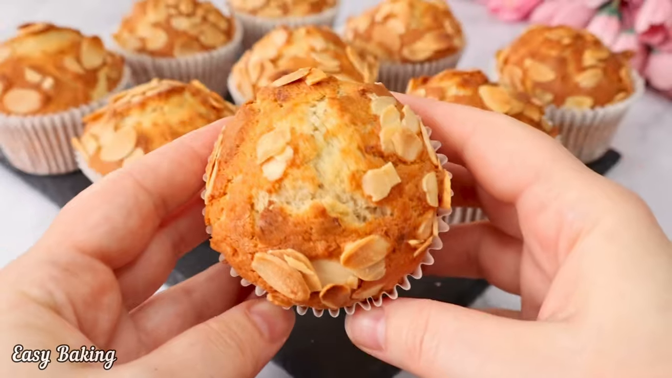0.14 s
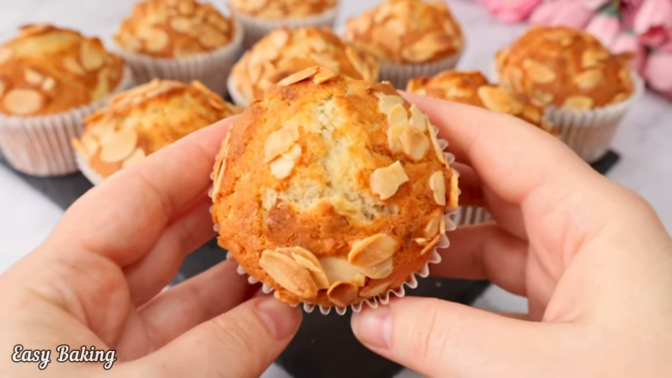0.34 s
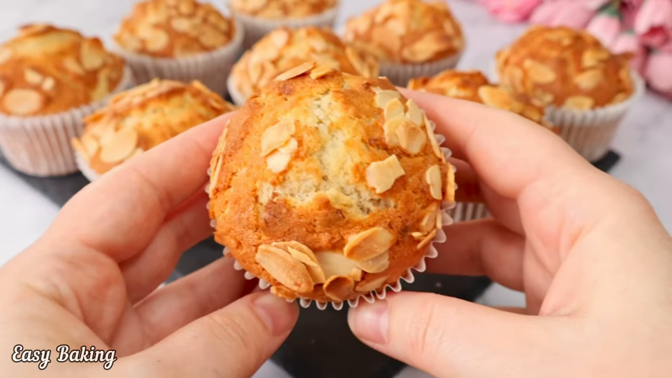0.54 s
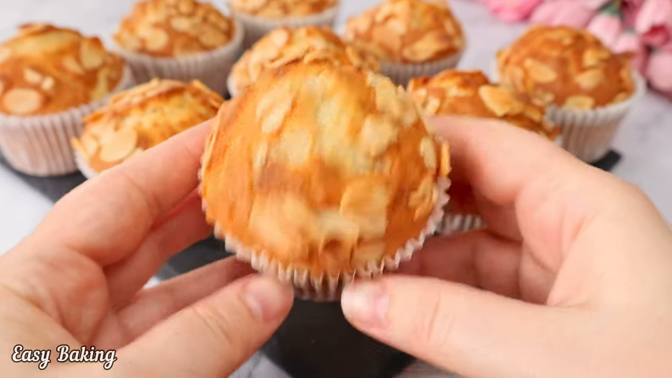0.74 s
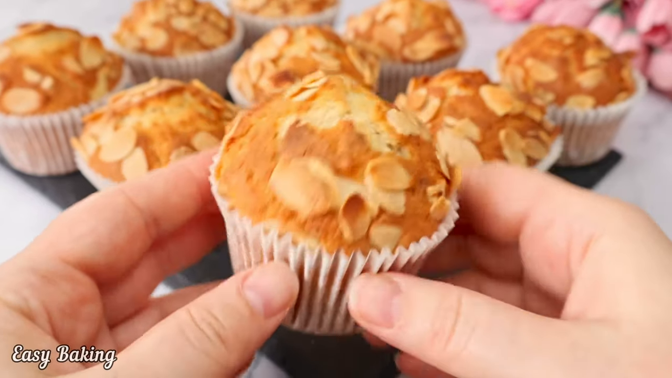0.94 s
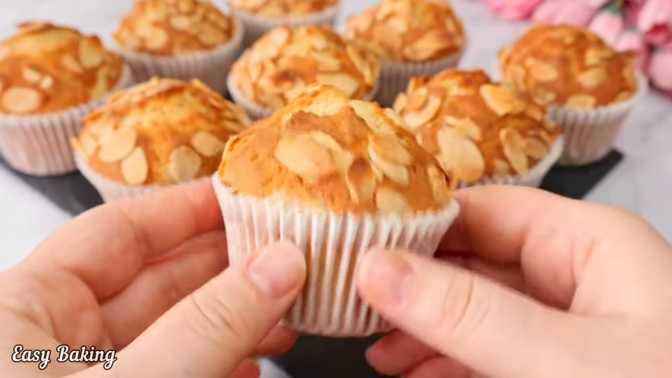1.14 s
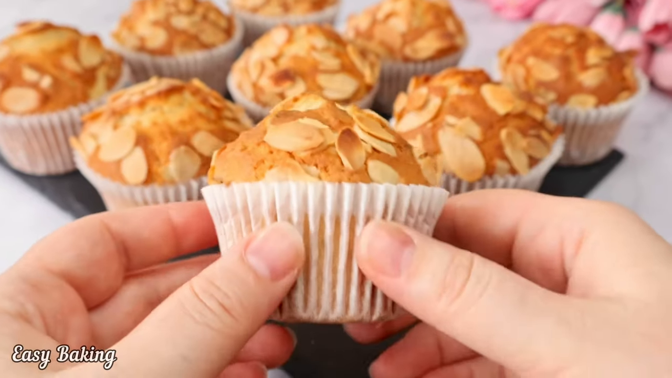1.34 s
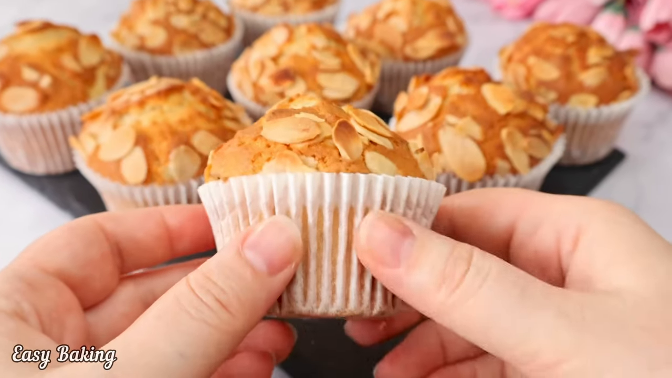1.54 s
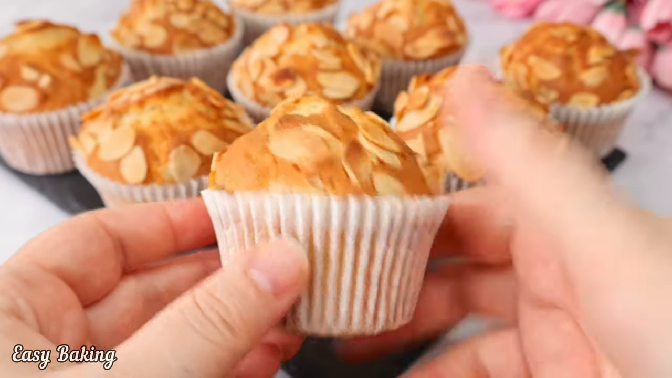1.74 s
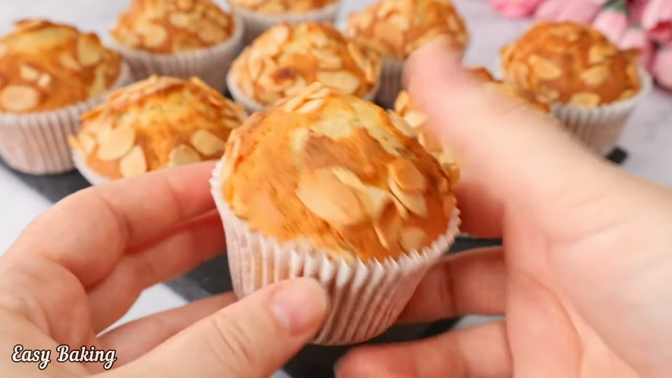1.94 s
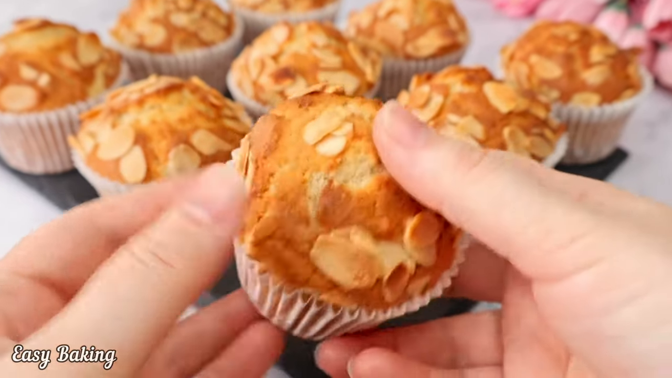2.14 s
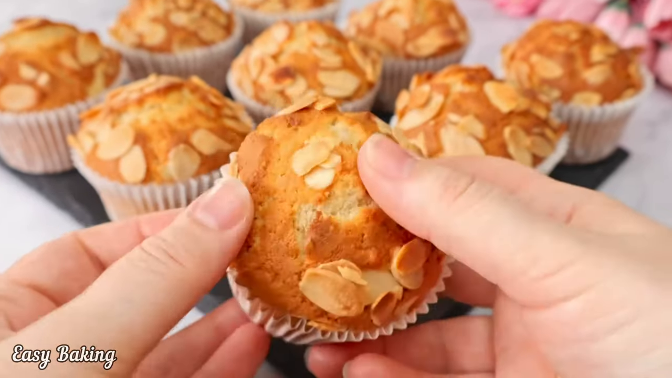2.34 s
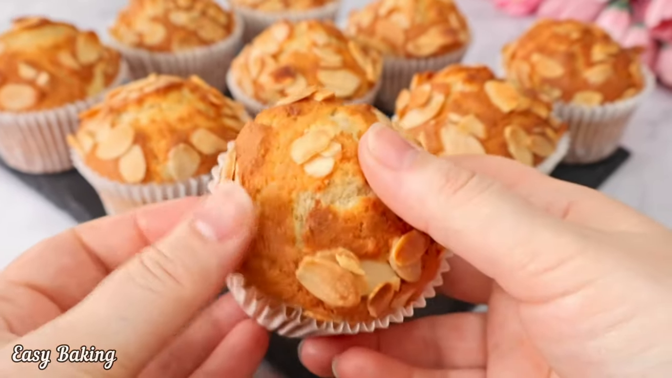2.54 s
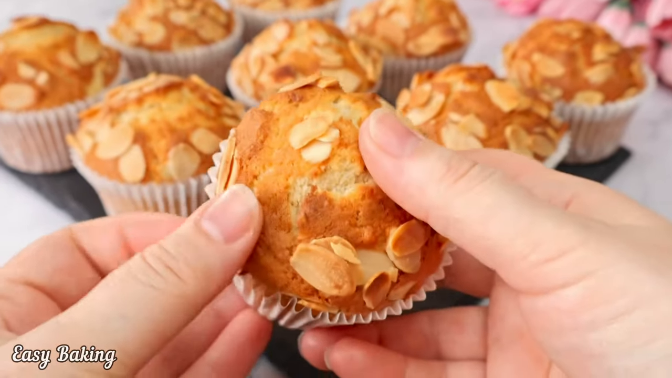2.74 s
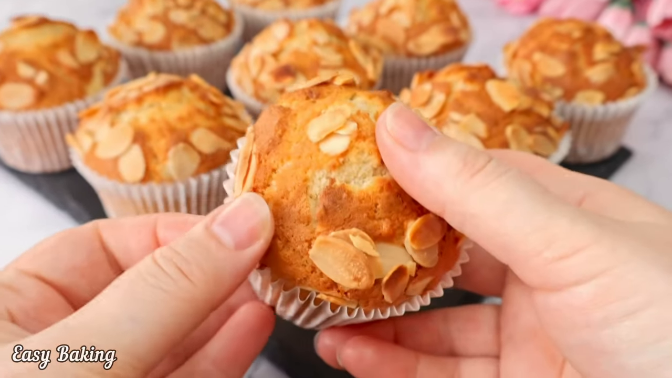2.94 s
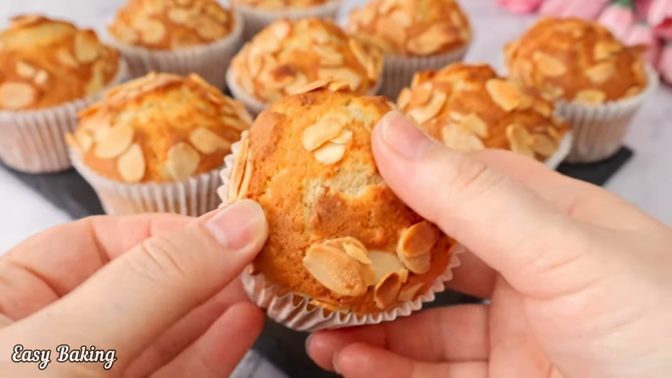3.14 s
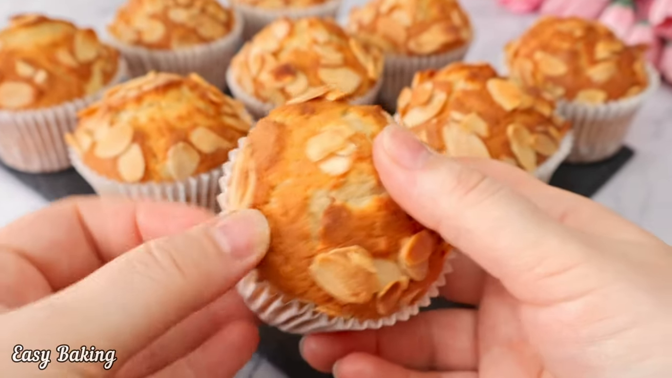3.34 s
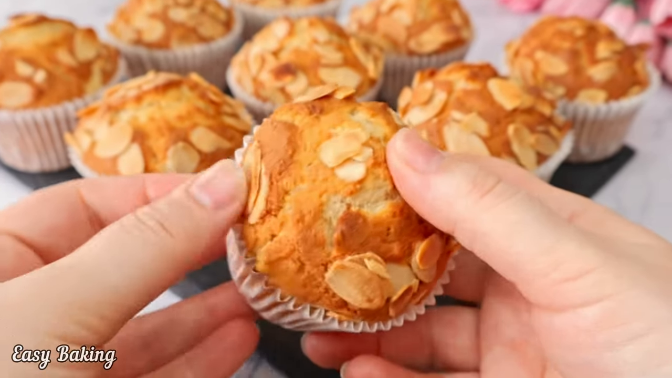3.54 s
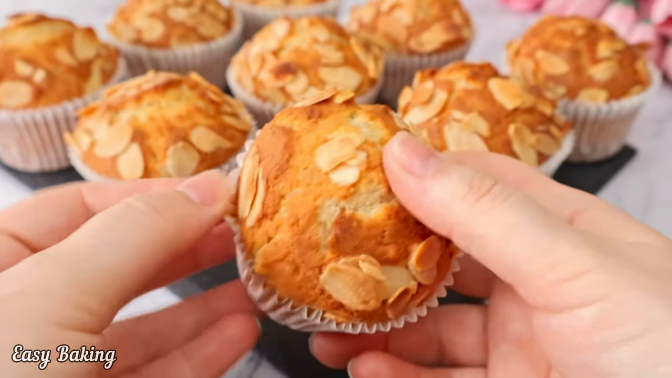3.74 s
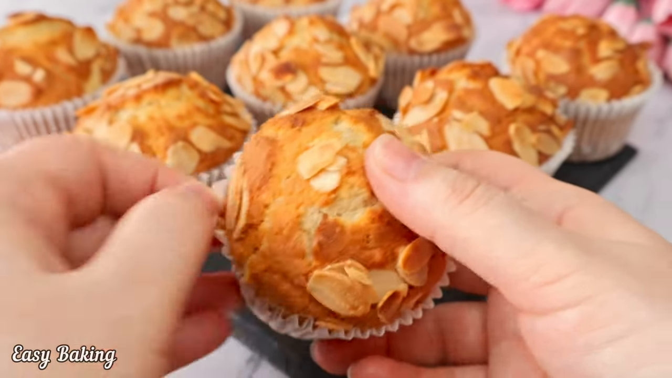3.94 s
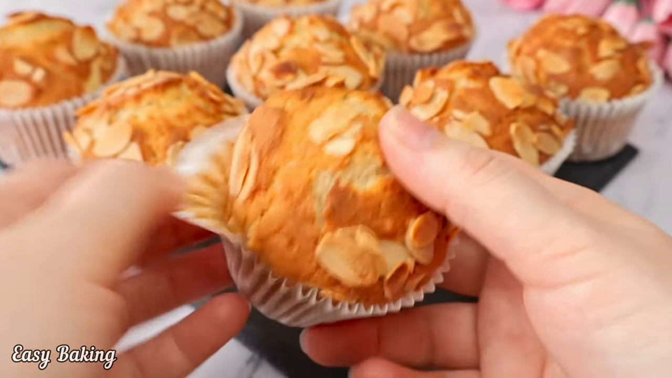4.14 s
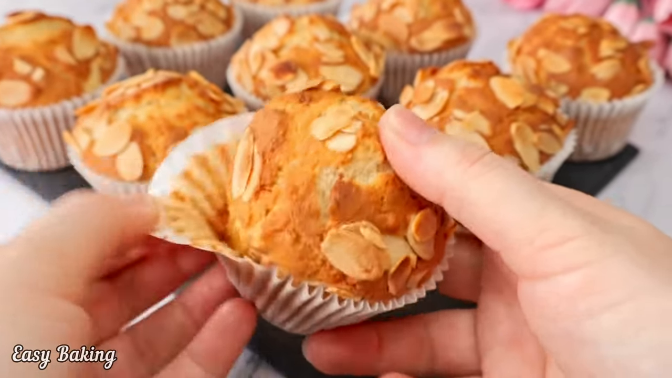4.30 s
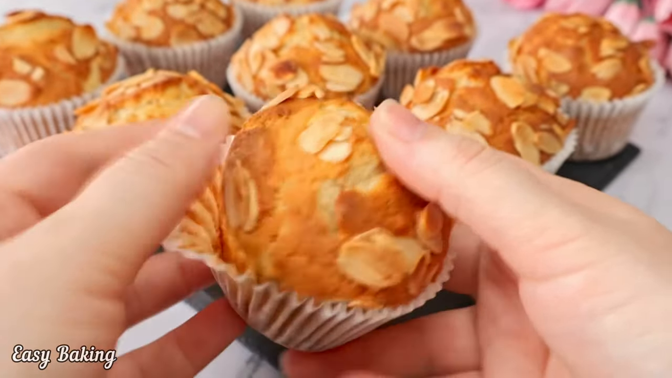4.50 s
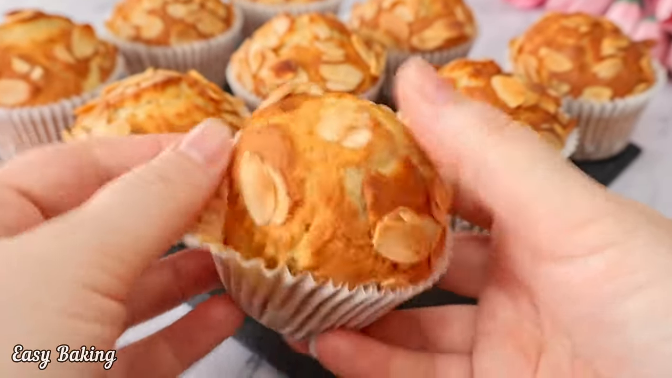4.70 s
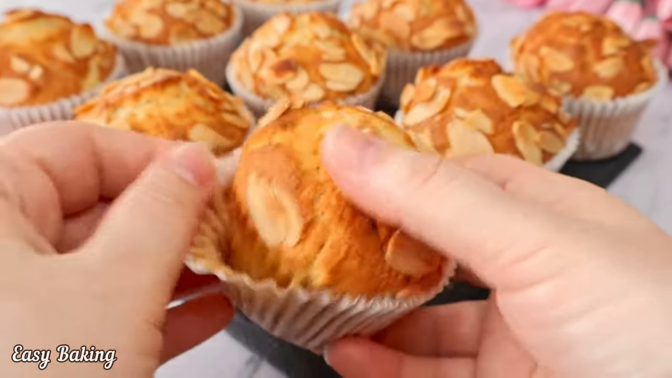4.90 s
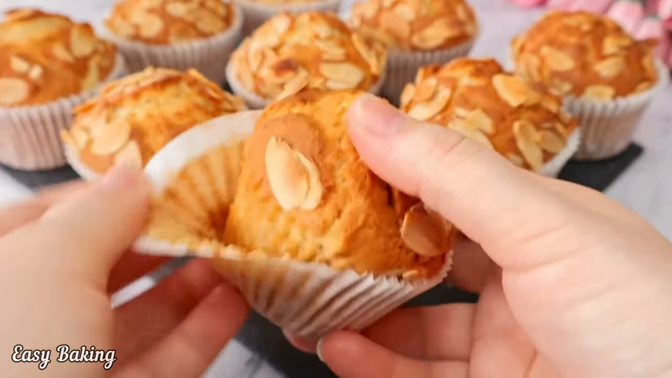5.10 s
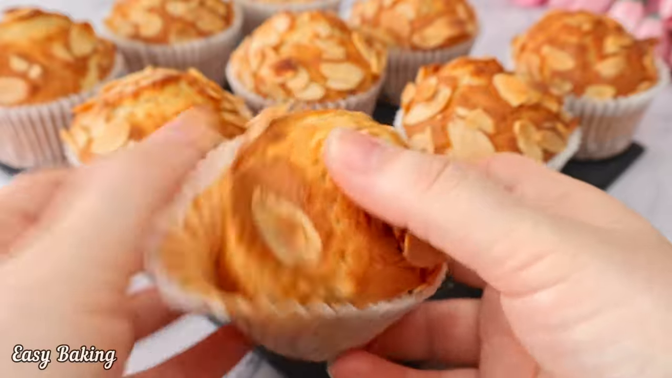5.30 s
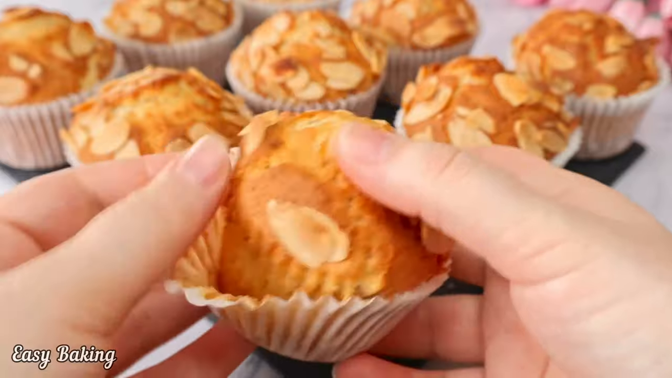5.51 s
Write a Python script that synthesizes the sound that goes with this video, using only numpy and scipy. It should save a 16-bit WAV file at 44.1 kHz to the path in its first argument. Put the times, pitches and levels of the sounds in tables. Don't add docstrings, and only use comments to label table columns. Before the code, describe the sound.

First, high thin bird sweeps and brief chirps over a soft airy wash, with only tiny skin-on-paper scuffs nearby. Then a muffin's pleated case is peeled: one sharp snap, dense crackling pulls, a lull with a faint hollow rub, another crackling cluster, and a hard late snap. Paper is dry, bright and close to the microphone; birds stay distant and echoing.

```python
import sys
import numpy as np
from scipy import signal
from scipy.fft import rfft, irfft
from scipy.io import wavfile
from scipy.ndimage import uniform_filter1d, map_coordinates

SR = 44100
rng = np.random.default_rng(int(sys.argv[2]) if len(sys.argv) > 2 else 0)


def to_linear_factor(level_db):
    exponent = np.asarray(level_db, float) / 20
    return 10 ** exponent


def store_pcm(level_fs):
    pcm = np.round(np.clip(level_fs, -1, 1) * 32767).astype(np.int16)
    wavfile.write(sys.argv[1], SR, np.atleast_2d(pcm).T)


N = 249606


def spectrum_at(points, hz):
    f, value = np.transpose(points)
    return np.interp(np.log(hz + 1), np.log(f + 1), value)


def evened(x):
    return x / np.sqrt(np.mean(x ** 2) + 1e-20)


def colour(x, points):
    gain = to_linear_factor(spectrum_at(points, np.fft.rfftfreq(N, 1 / SR)))
    return irfft(rfft(x) * gain, N)


def add(mix, s, sound):
    part = mix[..., round(s * SR):][..., :sound.shape[-1]]
    part += sound[..., :part.shape[-1]]


def echoes(t60, gap_s, channels):
    t = np.arange(round(.9 * SR)) / SR
    onset = np.clip((t - gap_s) / gap_s, 0, 1)
    tail = rng.standard_normal((channels, len(t))) * to_linear_factor(-60 * t / t60) * onset
    return tail / np.linalg.norm(tail, axis=1, keepdims=True)


# (frequency [Hz], density [dB per Hz])
HISS = [(3, -1), (8, -1.5), (21, -12), (36, -14.5), (62, -20.5), (100, -24), (400, -28), (1500, -34.5),
        (5000, -36), (9000, -38), (12000, -39), (15800, -41.5)]


def microphone_hiss():
    return to_linear_factor(-52.5) * evened(colour(rng.standard_normal(N), HISS))


# (frequency [Hz], density [dB per Hz])
AIR = [(25, -25), (60, 4), (100, -6.5), (300, -5), (700, 0.5), (1500, -4), (3000, -8), (5000, -12.5),
       (8000, -28), (12000, -38)]


def garden_air():
    return to_linear_factor(-59) * evened(colour(rng.standard_normal((2, N)), AIR))


def whistle(length, start_hz, end_hz, db, pan_db, shakes=0., depth_hz=0., throb=0.):
    t = np.arange(round(length * SR)) / SR
    shake = np.sin(2 * np.pi * shakes * t)
    hz = start_hz + (end_hz - start_hz) * (t / length) ** .75 + depth_hz * shake
    wobble = evened(uniform_filter1d(rng.standard_normal(SR // 4), 120))[:len(t)]
    hz = hz + 45 * (hz / 8000) ** 4 * wobble
    shape = signal.windows.tukey(len(t), min(0.0065 / length, 1)) * (1 + throb * shake)
    lag = np.array([[0], [2 * np.pi * rng.uniform(0.14, 0.63)]])
    ears = to_linear_factor(db + np.array([[.5], [-.5]]) * pan_db)
    return np.sqrt(2) * ears * shape * np.sin(2 * np.pi * np.cumsum(hz) / SR + lag)


# (length [s], start [Hz], end [Hz], level [dB])
EARLIER = [
    (.07, 4290, 4110, -45),
    (.06, 4100, 3700, -51),
]
# (time [s], length [s], start [Hz], end [Hz], left-ear level [dB])
LEFT_BIRD = [(1.043, 0.01, 2530, 2880, -50), (1.037, .112, 2760, 2880, -50.5),
             (1.12, 0.017, 4420, 4570, -49.5), (1.226, .013, 2250, 2850, -48.5),
             (1.238, 0.062, 2833, 2890, -47), (1.298, .06, 2890, 2920, -53), (1.375, .045, 2900, 2930, -53),
             (1.218, 0.014, 2300, 2270, -53.5), (1.497, 0.018, 2850, 2330, -44),
             (1.538, .015, 2350, 2950, -45), (1.559, 0.011, 2950, 2370, -44),
             (1.551, 0.009, 3250, 3400, -48), (1.636, 0.014, 3400, 2350, -50),
             (2.476, 0.056, 4380, 4423, -55), (1.147, .022, 4920, 4770, -54.5),
             (1.168, 0.018, 3950, 3780, -37), (1.285, .06, 3500, 3200, -57),
             (1.273, 0.0139, 3310, 2670, -41.5), (2.65, 0.055, 3340, 3220, -55)]
# (time [s], length [s], start [Hz], end [Hz], left-ear level [dB])
HIGH_BIRD = [(.385, 0.078, 8680, 8280, -53), (.475, 0.071, 8350, 7700, -50), (.65, 0.061, 7500, 6450, -55),
             (.69, 0.1, 8300, 7640, -49), (.897, .04, 7280, 6480, -53.5), (.9, 0.09, 8150, 7940, -51),
             (.991, 0.042, 8000, 7420, -51), (.935, .08, 6550, 6650, -61)]
# (time [s], length [s], start [Hz], end [Hz], left-ear level [dB])
FRONT_BIRDS = [(.016, .015, 3390, 3430, -56), (.012, 0.03, 3880, 3780, -60), (.128, .015, 3360, 3370, -54),
               (.237, .015, 3240, 3380, -58), (1.135, .015, 3770, 3890, -47),
               (1.186, 0.0135, 3700, 2800, -55), (1.252, 0.028, 3210, 3270, -46.5),
               (1.266, .008, 3300, 3650, -47), (1.377, .029, 2420, 2360, -59),
               (1.478, .01, 2850, 3050, -53), (1.491, .016, 4160, 4030, -50),
               (1.592, 0.015, 4080, 4070, -51), (2.893, 0.035, 4390, 4370, -54.5),
               (1.625, .015, 3340, 3360, -56), (2.106, .24, 3354, 3294, -46), (2.519, .02, 3720, 3940, -44),
               (2.601, .075, 4110, 4150, -53), (2.702, .068, 3170, 3200, -51),
               (2.838, .022, 3960, 3980, -54.5), (2.939, 0.017, 4030, 3953, -45),
               (2.955, .024, 3410, 3580, -50.5)]
# (time [s], length [s], start [Hz], end [Hz], shake rate [per s])
WARBLES = [
    (1.78, .07, 2260, 2350, 33),
    (1.845, .135, 2380, 2640, 33),
    (2.065, .05, 3420, 3340, 115),
    (2.69, .09, 5480, 5080, 70),
]
WARBLES_DB = [-66, -56, -51, -63.5]
# (time [s], length [s], start [Hz], end [Hz], throb rate [per s])
THROBS = [(2.368, .095, 4440, 4370, 52), (2.55, .13, 4550, 4570, 62), (2.2, .105, 3355, 3335, 5),
          (2.63, .2, 6950, 6800, 40), (1.55, .04, 4550, 4550, 50), (2.46, .1, 4400, 4340, 52)]
THROBS_DB = [-45, -60, -57, -79, -66, -47]


def bird_notes(lead):
    direct = np.zeros((2, N + lead))
    heard = direct[:, lead:]
    for note in EARLIER:
        add(direct, 0, whistle(*note, 0.))
    for song, pan_db in ((LEFT_BIRD, 24), (HIGH_BIRD, 9), (FRONT_BIRDS, 4.5)):
        for s, *note, left_db in song:
            add(heard, s, whistle(*note, left_db - pan_db / 2, pan_db))
    for (s, *note, shakes), db in zip(WARBLES, WARBLES_DB):
        add(heard, s, whistle(*note, db, 6.0, shakes, depth_hz=140, throb=0.43))
    for (s, *note, shakes), db in zip(THROBS, THROBS_DB):
        add(heard, s, whistle(*note, db, 8., shakes, depth_hz=15, throb=.4))
    return direct


# (frequency [Hz], echo level [dB])
WETNESS = [(1500, -10), (3000, 1.5), (4500, 5.5), (6000, 9), (8000, 5.5)]


def birds():
    lead = SR // 10
    direct = bird_notes(lead)
    trees = signal.fftconvolve(direct[:1], echoes(t60=1.1, gap_s=0.008, channels=2), axes=1)
    trees = trees[:, lead:N + lead]
    drift = uniform_filter1d(uniform_filter1d(rng.standard_normal(N), 700), 700)
    sway = np.arange(N) + 1.4 * evened(drift)
    trees = np.array([map_coordinates(ear, [sway], order=3, mode="nearest") for ear in trees])
    return to_linear_factor(0.5) * direct[:, lead:] + to_linear_factor([[-9], [-11]]) * colour(trees, WETNESS)


def crackle(per_s, spread_db):
    clumps = to_linear_factor(2.2 * evened(uniform_filter1d(rng.standard_normal(N), 150)))
    size = to_linear_factor(spread_db * np.minimum(rng.exponential(1, N), 4)) * rng.standard_normal(N)
    return evened(clumps * size * (rng.random(N) < per_s / SR))


def hum(curve, half_width_hz):
    s, hz, db = np.transpose(curve)
    t = np.arange(N) / SR
    lowpass = signal.butter(2, half_width_hz, fs=SR, output="sos")
    grain = evened(signal.sosfilt(lowpass, crackle(per_s=8000, spread_db=0.0)))
    level = to_linear_factor(np.interp(t, s, db, left=-120, right=-120))
    carrier = np.sin(2 * np.pi * np.cumsum(np.interp(t, s, hz)) / SR)
    return np.sqrt(2) * level * grain * carrier


# (time [s], pitch [Hz], level [dB])
HOLLOW = [
    (4.64, 2600, -69),
    (4.679, 2640, -52.5),
    (4.778, 2760, -51.5),
    (4.86, 2800, -53),
    (4.91, 2860, -52.5),
    (4.94, 2890, -71),
]


def hollow_case():
    return hum(HOLLOW, half_width_hz=220)


# (time [s], pitch [Hz], level [dB])
RIM = [
    (4.65, 13700, -70),
    (4.69, 13700, -55),
    (4.71, 13800, -54),
    (4.76, 14000, -65),
    (4.9, 13600, -63),
    (4.92, 13600, -75),
]


def nail_on_rim():
    return hum(RIM, half_width_hz=500)


def ring(x, modes):
    pulse, body = signal.unit_impulse(1024), 0
    for k, (hz, width, db) in enumerate(modes):
        b, a = signal.iirpeak(hz, hz / width, SR)
        body = body + (-1) ** k * to_linear_factor(db) * signal.lfilter(b, a, signal.lfilter(b, a, pulse))
    return signal.oaconvolve(x, body / np.linalg.norm(body))[:N]


# (frequency [Hz], width [Hz], level [dB])
PRESS = [(330, 334, 0)]
# (time [s], level [dB], fall on either side [dB per s])
PRESSES = [
    (.71, -57.5, 78),
    (2.9, -60, 120),
    (3.37, -64.5, 28),
    (3.59, -52.5, 450),
    (3.95, -61.5, 25),
    (4.27, -51.5, 240),
    (4.68, -59.5, 18),
    (5.11, -55, 154),
    (5.23, -55, 108),
    (5.53, -52.5, 190),
]


def cake_rub():
    t = np.arange(N) / SR
    press_db = np.max([db - fall * abs(t - s) for s, db, fall in PRESSES], axis=0)
    grip_db = -69
    return to_linear_factor(np.maximum(press_db, grip_db)) * ring(rng.standard_normal(N), PRESS)


# (frequency [Hz], width [Hz], level [dB])
THUD = [(740, 900, 13.4), (1626, 1250, 20.2)]
BODY = [(3004, 1050, -2), (4440, 2200, -3.5)]
CRACK = [(5950, 1560, 0.013), (8600, 2930, 0)]
FIZZ = [(13900, 4100, -10), (14300, 1400, -14)]


def paper(drive):
    return sum(ring(d, modes) for d, modes in zip(drive, (CRACK, THUD, BODY, FIZZ)))


# (time [s], length [s], crack [dB], thud over crack [dB], fizz over crack [dB])
SLIDES = [(.671, 0.092, -48, -38, -7), (.707, 0.15, -58.5, -5, -2), (1.18, .073, -67, -7, -6),
          (1.637, 0.13, -63.5, -8, -9), (1.787, 0.038, -58.5, -8, -12), (1.872, .062, -56.5, -9, -5),
          (1.976, .11, -50.5, -26, -13), (2.17, .03, -68, -12, 2), (2.22, 0.044, -66, -7, -9),
          (2.54, .041, -64, -9, -6), (2.856, 0.098, -61.5, 0, -2), (3.225, 0.012, -58.5, -6, -5),
          (3.33, .066, -50.5, -46, -6), (3.568, 0.027, -61.5, 3, -6)]
# (time [s], length [s], crack [dB], thud over crack [dB], fizz over crack [dB])
TEARS = [(3.792, 0.029, -37, -12.5, -11), (3.905, 0.053, -48, -16, -7), (4.063, 0.078, -49, -11, -8),
         (4.124, 0.1, -49.5, -7, -1), (4.182, 0.077, -46.5, -2, -5), (4.237, 0.072, -47.5, -12, -5),
         (4.28, 0.062, -55.5, -3, -8), (4.383, .12, -53.5, -1.5, -4), (4.425, 0.031, -46, -11, -12),
         (4.588, 0.036, -57.5, 0, -11), (4.638, 0.13, -50, -5.5, -11), (4.7, 0.012, -44, -9, -6),
         (4.718, 0.18, -48.5, -6, -13), (4.856, 0.064, -53.5, 1.5, -10), (4.989, 0.13, -48, -9, -2),
         (5.083, .13, -53, -0.5, -7), (5.019, 0.017, -36, -2, -2), (4.992, 0.013, -52, 10, -6),
         (4.259, .009, -36, -3, -8), (5.172, 0.16, -54.5, 1, -21), (5.297, 0.023, -46, -2, 1),
         (5.305, 0.18, -63, 0.5, -7), (5.464, 0.13, -63, 6, -21), (5.6, 0.11, -48, -4.5, -10)]


def rustle():
    power = np.zeros((4, N))
    for scuffs, body_db in ((SLIDES, -6), (TEARS, -0.8)):
        for s, length, db, depth_db, fizz_db in scuffs:
            swell = signal.windows.tukey(round(length * SR), .85)
            parts_db = np.array([0, depth_db, body_db + 0.2 * depth_db, fizz_db])
            add(power, s, (to_linear_factor(db + parts_db[:, None]) * swell) ** 2)
    fine = crackle(per_s=10000, spread_db=-4.0)
    coarse = crackle(per_s=5000, spread_db=0.1)
    middle = crackle(per_s=5000, spread_db=1.5)
    thin = crackle(per_s=6000, spread_db=2)
    grains = [fine, coarse, 0.9 * coarse + 0.72 * middle, 1.34 * fine + 0.69 * thin]
    return paper(np.sqrt(power) * grains)


def flattened(noise, bins):
    spectrum = rfft(noise)
    return irfft(spectrum / uniform_filter1d(abs(spectrum), size=bins))


# (frequency [Hz], level [dB])
TOP = [(15900, 0), (16100, -17), (17100, -22), (17200, -90)]
# (time [s], level [dB], pitch of the
# patch [Hz])
FLEXES = [(4.1838, -26.5, 6100), (4.2619, -38, 5950), (4.2641, -25.5, 5870), (4.29, -47, 5950),
          (5.0963, -36, 6100), (5.542, -47, 6300), (4.2296, -35, 800), (4.273, -41.5, 422),
          (4.418, -47, 1540), (4.4595, -46, 1100), (4.703, -50, 1190), (4.884, -48, 1640),
          (4.999, -37, 1080), (5.021, -39, 940), (5.117, -45, 1530), (5.138, -38, 1900), (5.286, -50, 800),
          (5.63, -51, 1340), (4.19, -41, 14000), (4.2055, -39, 13800), (4.2305, -42, 14000),
          (4.2635, -35, 13900), (4.684, -51, 13700), (4.8075, -44, 8000), (4.9858, -29, 9100),
          (5.0323, -29.5, 8050), (5.0035, -40, 5300), (5.067, -41, 5500), (3.7958, -38.5, 4500),
          (3.8063, -46, 3600), (5.338, -56, 5550), (5.354, -55, 5000), (4.601, -57, 2720),
          (3.766, -23, 14300), (5.4695, -28, 6400), (5.4695, -24, 14400), (5.0315, -33, 650),
          (4.2635, -31, 2900), (4.193, -41, 2800), (4.7025, -44, 6000), (5.101, -38, 7500),
          (3.909, -30, 9500), (3.588, -52, 600)]


def flexes():
    out, t = np.zeros(N), np.arange(300) / SR
    decay_s = 0.0008
    for s, db, hz in FLEXES:
        noise = rng.standard_normal(len(t)) * np.exp(-t / decay_s)
        shake = evened(flattened(noise, 9) * np.exp(-t / (2 * decay_s)))
        width_hz = 530 + .22 * hz
        add(out, s, ring(to_linear_factor(db) * shake, [(hz, width_hz, 0)]))
    return colour(out, TOP)


# (time [s], crack [dB], depth of fold as thud over crack [dB], fizz
# over crack [dB])
PLEAT_SNAPS = [(3.7662, -14, -48, -4), (3.8985, -51, -12, 3), (3.796, -36, -6, -11), (3.9098, -26, -35, 7),
               (3.915, -43, -14, -2), (3.924, -46, -6, -10), (3.9297, -36.5, -18, -10),
               (3.9343, -24.5, -27, -14), (3.9367, -29.5, -22, -10), (3.9747, -41, -21, 8),
               (3.982, -24, -39, -10), (4.205, -47, -12, 7), (4.087, -45, -19, -9), (4.1, -35.5, -3, -9),
               (4.1321, -24.5, -20, 3), (4.1532, -42, -9, -2), (4.183, -30, 1.5, -2), (4.1839, -22, -15, 0),
               (4.1872, -28, -18, -8), (4.1897, -36.5, 0, 4), (4.193, -44, 2, -8), (4.2167, -33, -21, -7),
               (4.22, -41, -9, 0), (4.2298, -43.5, 6, -6), (4.2456, -34, -24, -7), (4.2492, -33, -20, -13),
               (4.253, -28, -24, -16), (4.261, -35, -4, -5), (4.2631, -25, -4.5, -9),
               (4.274, -45.5, 8.5, -6), (4.315, -51.5, 7, -11),
               (4.4026, -44.5, 2.5, -17), (4.442, -39, -24, -10), (4.4584, -38, -1.5, -18),
               (4.8087, -41, -19, -6), (4.9722, -47, 2, -14), (4.9777, -34.5, -14, -11),
               (4.9854, -24, -17, -1.5), (5.0013, -32, 1, -14), (5.0056, -33, -20, -9),
               (5.0205, -27.5, 0, -4), (5.032, -26, 3.5, -5), (5.0435, -30, -36, -1),
               (5.048, -28.5, -37, 0), (5.059, -42, -4, -4), (5.067, -39, -9, -6), (5.0875, -40, 2, 5),
               (5.0969, -20.5, -6, -3), (5.1008, -33, -22, -14), (5.11, -41, -19, 12),
               (5.1293, -34, -26, -4), (5.138, -45, 7, -4), (5.038, -38, -15, -3), (5.305, -35, -10, -10),
               (5.295, -51.5, 7, -11), (5.4676, -39, -12, 7), (5.4691, -14, -15, -3.5),
               (5.539, -49, -21, -21), (5.5433, -44, -18, -20), (5.5606, -40, -16, -25),
               (5.572, -51, -2, -15), (5.594, -34.5, -7, -19)]


def snaps():
    drive, t = np.zeros((4, N)), np.arange(220) / SR
    for s, db, depth_db, fizz_db in PLEAT_SNAPS:
        ms = max(.53 + .016 * depth_db - .0125 * db, .2)
        body_db = -2.5 + 0.29 * depth_db
        noise = rng.standard_normal(len(t)) * t * np.exp(-t / (0.0011 * ms))
        envelope = np.minimum(t / 0.00014, 1) * np.exp(-t / (.0016 * ms))
        burst = evened(flattened(noise, 11) * envelope)
        parts_db = np.array([0, depth_db, body_db, fizz_db])[:, None]
        add(drive, s - .0003, to_linear_factor(db - 6.0 + parts_db) * burst * [[1], [1], [1], [-1]])
    return colour(paper(drive), TOP)


# (frequency [Hz], level [dB])
ROOM = [(200, -5), (2000, -3), (3000, -4.5), (4500, -4.5), (7000, -2.5), (10000, -4.5), (16000, -8.5)]


def room_tail(snap):
    tail = signal.fftconvolve(snap, echoes(t60=0.35, gap_s=0.0012, channels=1)[0])[:N]
    return to_linear_factor(-7.5) * colour(tail, ROOM)


def scene():
    snap = snaps() + flexes()
    background = microphone_hiss() + garden_air() + birds()
    handling = cake_rub() + rustle() + hollow_case() + nail_on_rim()
    steady = background + handling + room_tail(snap)
    edge_hz = 15950
    below_edge = np.fft.rfftfreq(N, 1 / SR) < edge_hz
    return snap + irfft(rfft(steady) * below_edge, N)


def low_pass(x):
    return signal.sosfilt(signal.butter(12, 17150, fs=SR, output="sos"), x)


def record(dry):
    mix = np.clip(dry, -1, 1)
    return low_pass(mix)


dry = scene()
out = record(dry)
store_pcm(out)
```